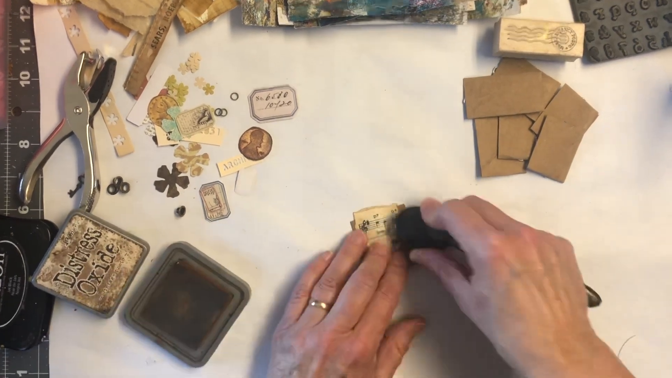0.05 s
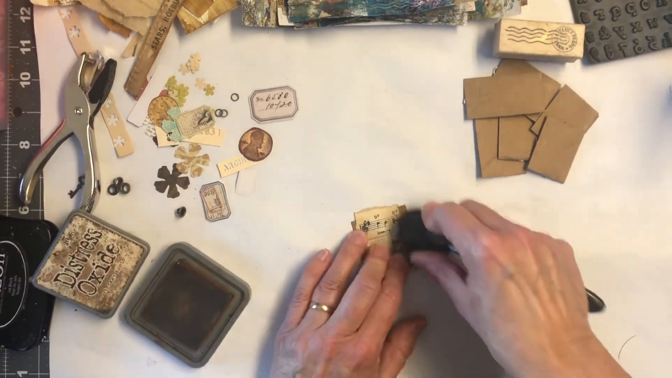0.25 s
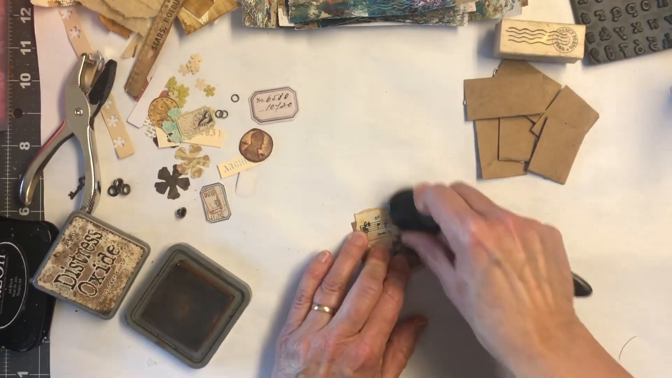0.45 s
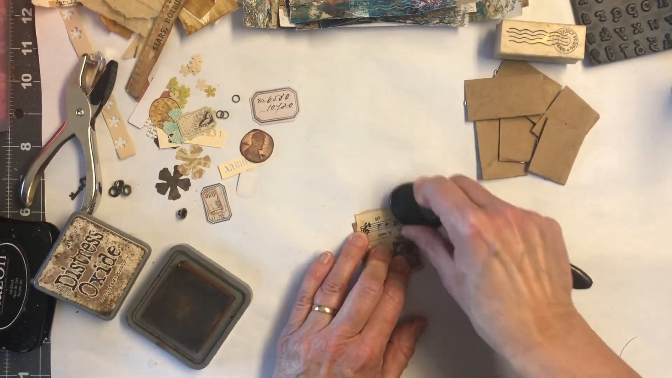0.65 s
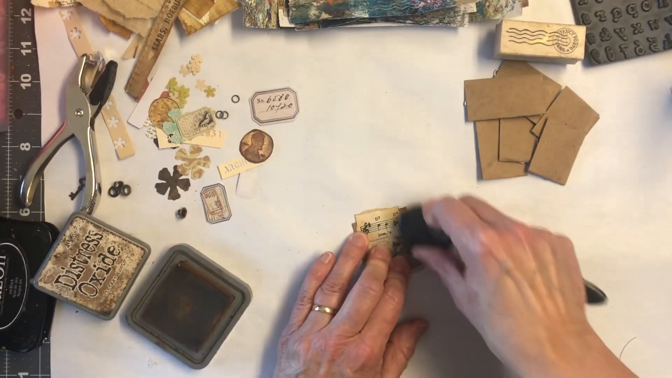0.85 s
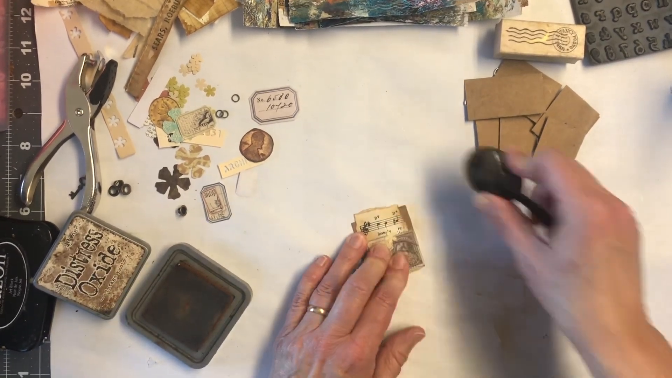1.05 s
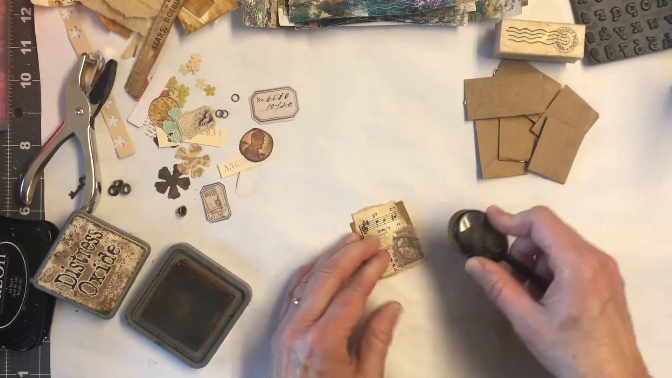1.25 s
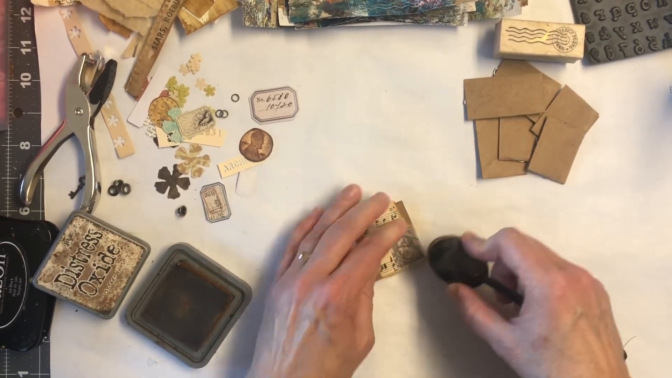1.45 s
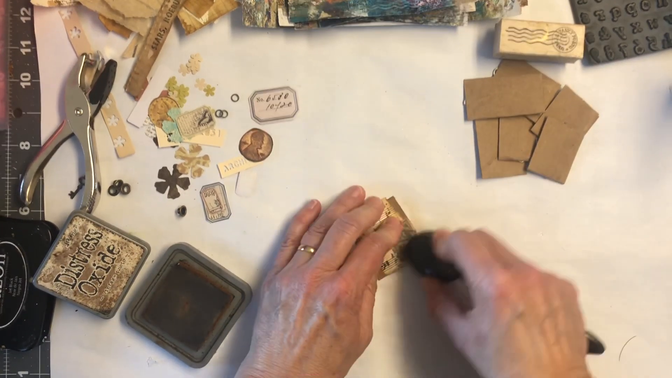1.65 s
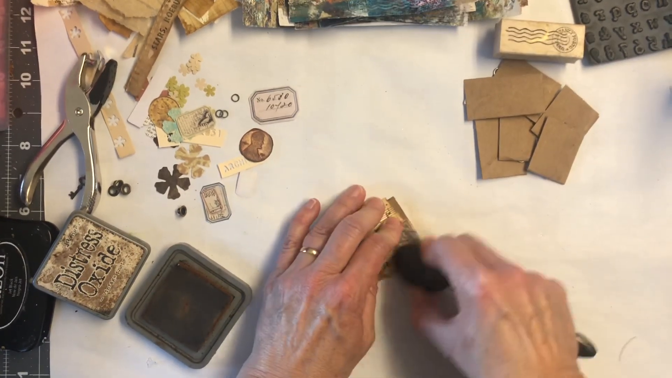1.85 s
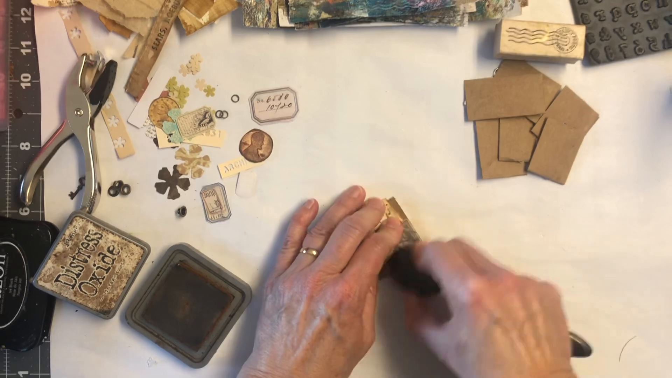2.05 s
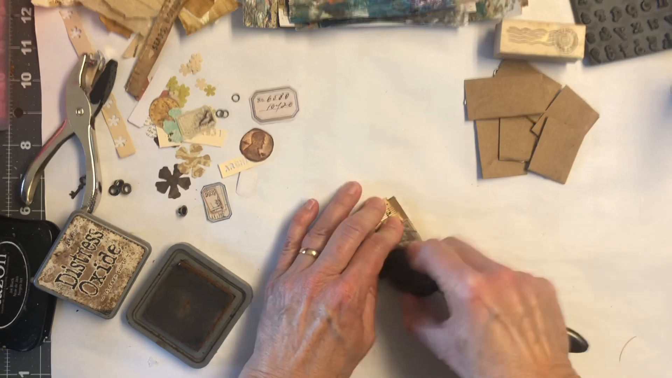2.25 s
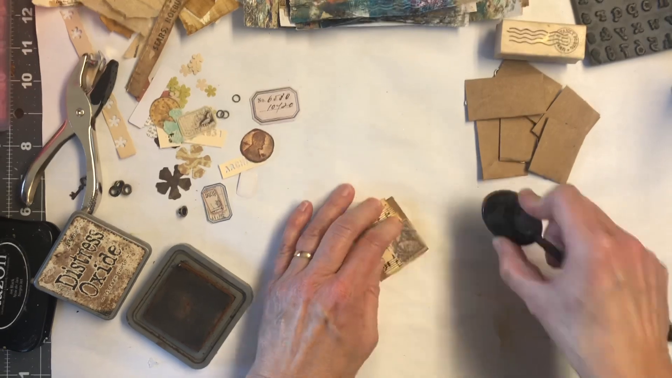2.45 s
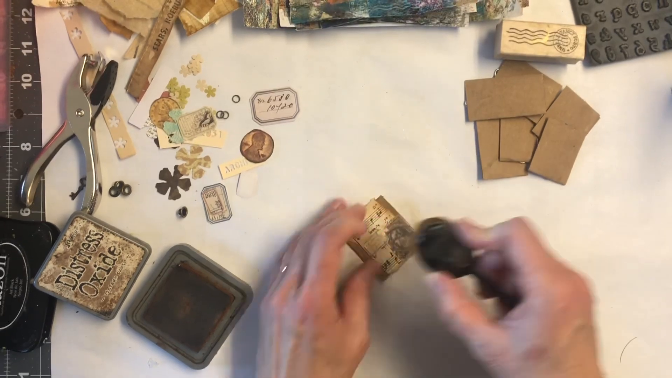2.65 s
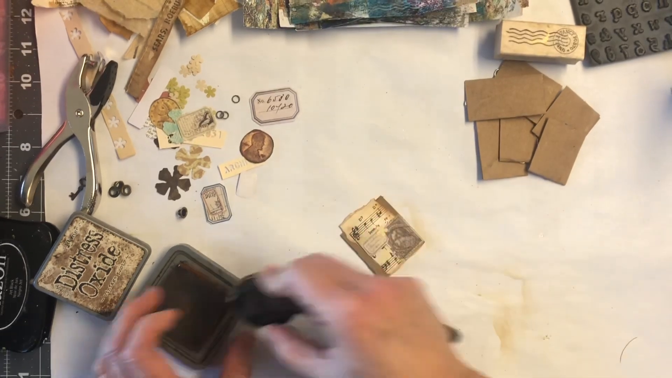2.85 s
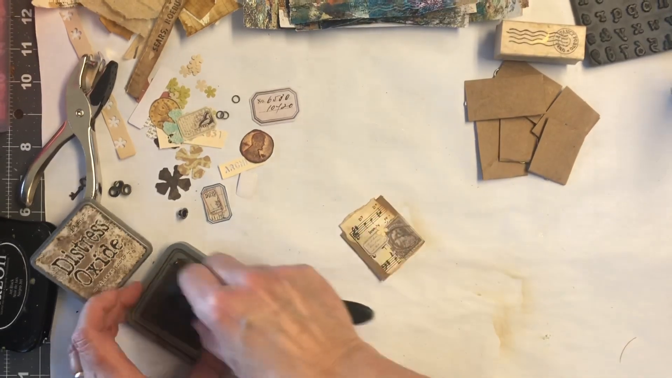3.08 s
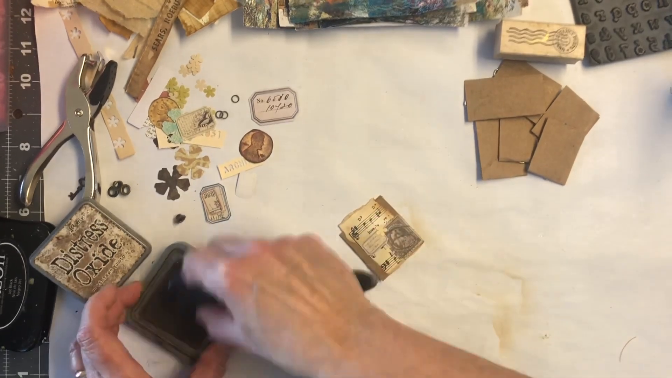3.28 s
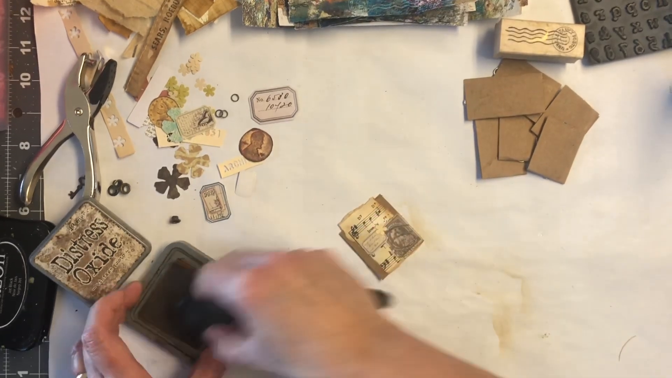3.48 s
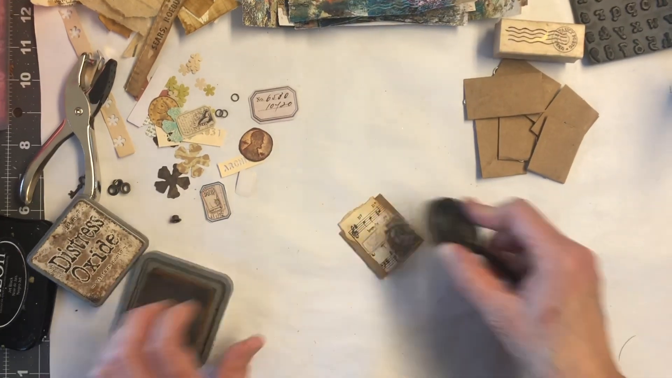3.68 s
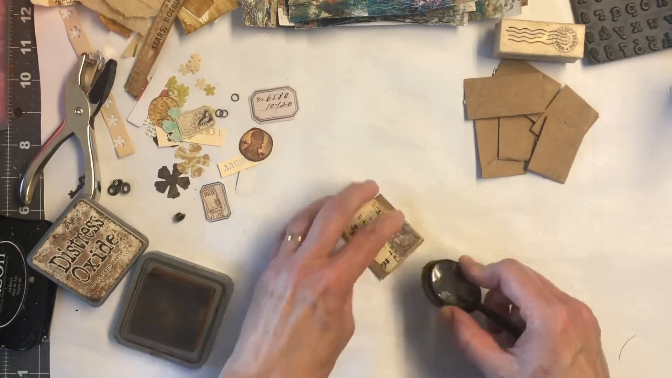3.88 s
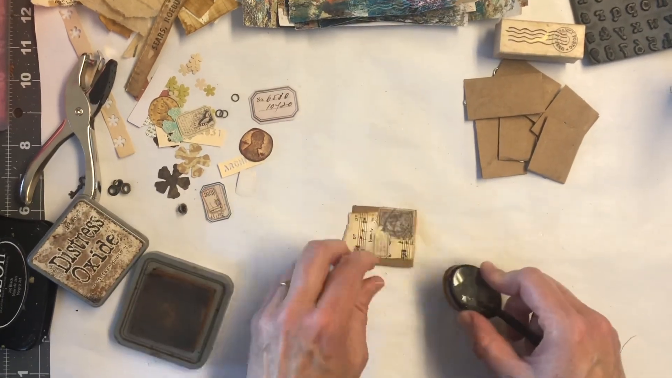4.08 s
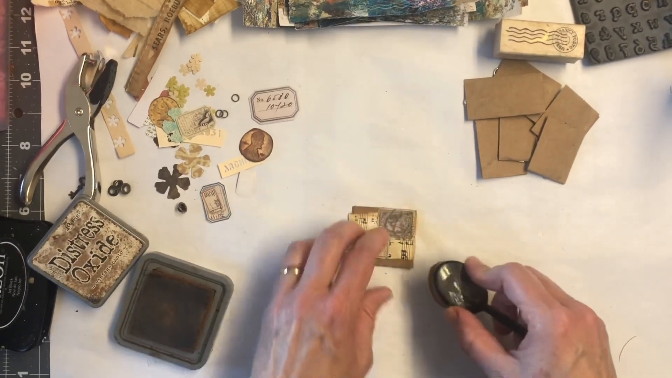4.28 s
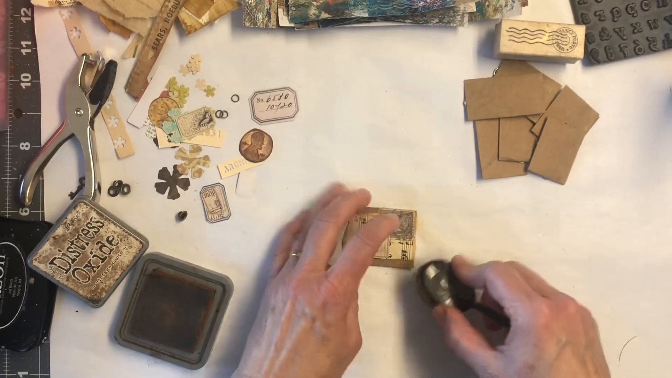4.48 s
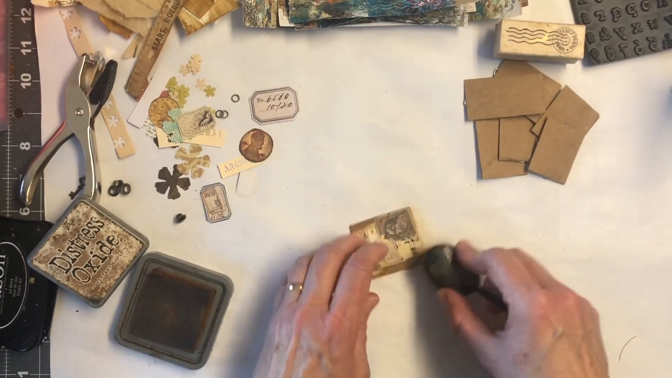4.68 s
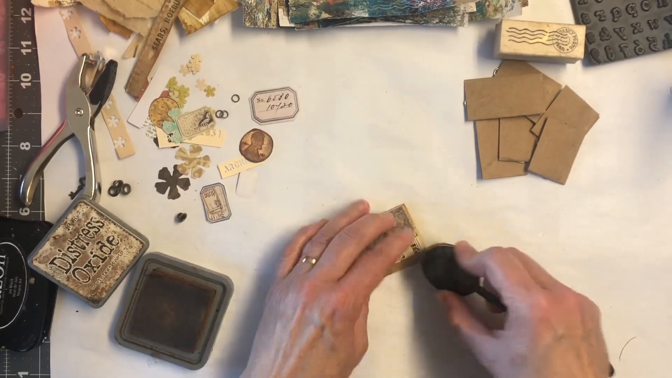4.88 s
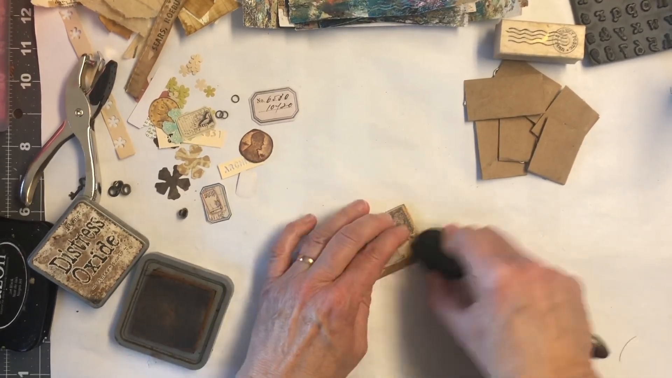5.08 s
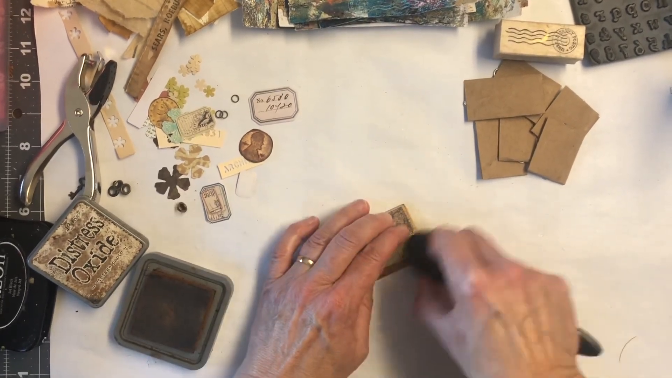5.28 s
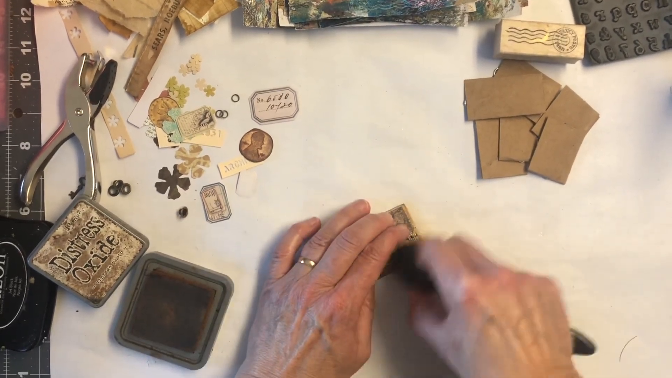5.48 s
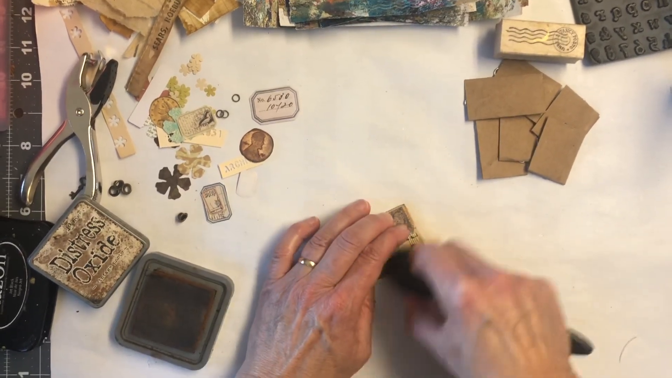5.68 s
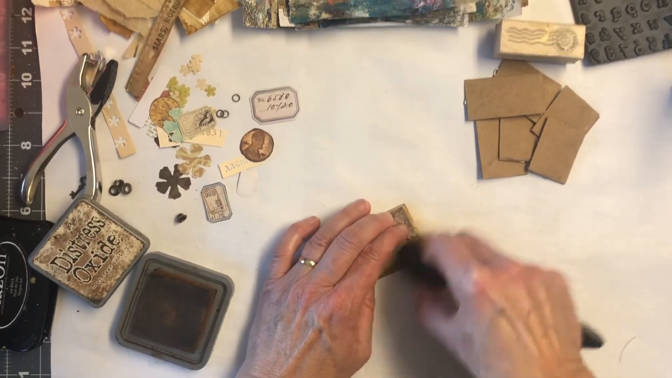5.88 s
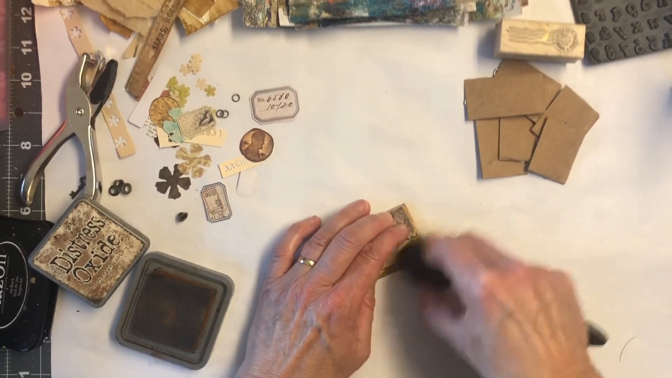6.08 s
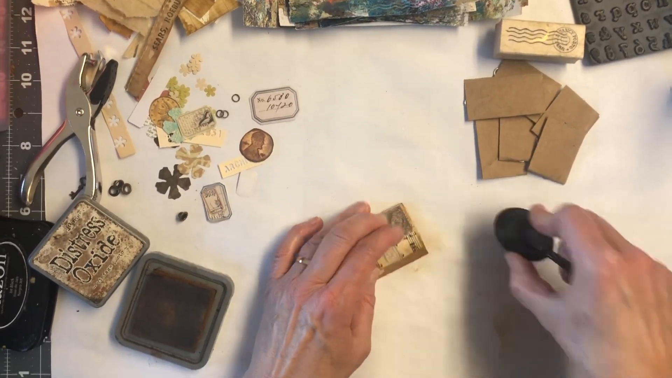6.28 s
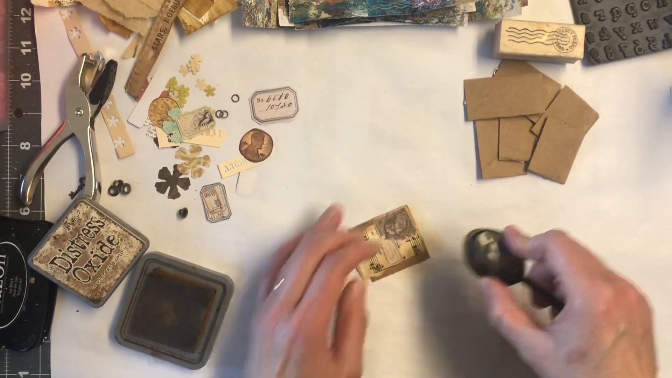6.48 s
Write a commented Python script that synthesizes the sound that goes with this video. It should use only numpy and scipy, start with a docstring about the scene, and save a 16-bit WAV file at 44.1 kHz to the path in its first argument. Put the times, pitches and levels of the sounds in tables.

```python
"""A foam blending tool rasps over the edges of a small piece of paper: single wipes, then quick scrubs.
As it works, the paper's edge flicks free and the craft table rumbles under the hand.
About three seconds in, the plastic ink pad is grabbed, dabbed and put down, its case knocking.
Fingers then slide the paper round, and a second spell of back-and-forth scrubbing ends the scene.
One microphone overhead hears it all in a small quiet room."""
import sys
import numpy as np
from scipy import signal
from scipy.fft import rfft, irfft
from scipy.io import wavfile

SR = 44100
rng = np.random.default_rng(int(sys.argv[2]) if len(sys.argv) > 2 else 0)


def wrap_up_sound(samples):
    """Save the sound to the file named by the first command line argument, as 16-bit audio."""
    columns = np.atleast_2d(samples).T
    # keep every value between -1 and 1, then stretch to whole-number steps
    tamed = np.clip(columns, -1, 1)
    steps = np.round(tamed * 32767).astype(np.int16)
    wavfile.write(sys.argv[1], SR, steps)


N = 287973
TIME = np.arange(N) / SR
# how strong each pitch is in rubbed paper: pitch_hz, level_db
PAPER_COLOUR = [(150, -31), (420, -7), (620, -10), (850, -6.5), (1200, -11), (1900, -9), (2600, -4.5),
                (3300, -2), (4200, 3.5), (6300, -0.2), (7800, -5), (11000, -6), (16000, -8)]


def rubbing():
    """Each stroke rasps on the paper and shakes the table; in the turns a light, duller touch stays."""
    # the treble opens up over the first spell: time_s, level_db
    treble_curve = [(0, -6), (.75, -5), (.95, -1.7), (2.3, -0.5), (3.3, -1.5), (5, -1)]
    # the table's rumble: pitch_hz, level_db
    rumble_colour = [(30, -6), (55, 6.5), (78, 5), (105, -4), (170, -0.5), (260, -15), (450, -16.5),
                     (900, -14), (3000, -68)]
    body, rasp, air, shake = np.zeros((4, N))
    for start, end, db, swell_db, body_db, air_db, rumble_db in strokes():
        level = from_db(db) * stroke_shape(start, end, swell_db, rise_s=0.0066, fall_s=0.0099)
        touch = from_db(db - 23) * stroke_shape(start - .028, end + .066, 0, rise_s=.018, fall_s=.0085)
        rasp += level + touch
        body += (level + touch * 2) * from_db(body_db)
        air += (level + touch) * from_db(air_db)
        # the table shakes most early in the stroke, as the hand bears down
        shake += from_db(db + rumble_db) * stroke_shape(start + .006, end, -8, rise_s=.008, fall_s=.016)
    fibres = friction(per_s=40000, spread_db=1.1, rough_db=1)
    snags = friction(per_s=900, spread_db=1.2, rough_db=2)  # the cut edge catches
    scrape = coloured(hand_echo(fibres + from_db(-12) * snags), PAPER_COLOUR)
    low, middle, top = map(unit_rms, split(scrape, [2500, 8000]))
    treble = from_db(np.interp(TIME, *np.transpose(treble_curve)))
    paper = body * low + rasp * middle + air * treble * top
    return paper + shake * coloured(rng.standard_normal(N), rumble_colour)


def strokes():
    """Every stroke of foam or finger: start_s, end_s, level_db, swell_db, body_db, air_db, rumble_db."""
    # quick scrubs, a push and a mostly lighter pull back: start_s, end_s, push_db, pull_db
    scrubs = [(1.769, 1.894, -43.5, -49), (1.948, 2.089, -43, -47.5), (2.135, 2.289, -42, -47.5),
              (5.042, 5.165, -42.5, -45.5), (5.21, 5.349, -45, -43.5), (5.397, 5.542, -45.5, -44),
              (5.584, 5.736, -42.5, -44), (5.78, 5.947, -40.5, -44.5), (5.992, 6.14, -41, -46.5)]
    # single wipes of the foam along the edge: start_s, end_s, level_db, swell_db
    wipes = [(0.067, 0.161, -45, 8.5), (0.212, 0.286, -42, 5), (0.345, 0.421, -43, 0.5),
             (0.468, 0.546, -42.5, 3), (0.605, 0.676, -42, -2), (0.716, .803, -43.5, 0.5),
             (0.848, 0.963, -43.5, -6.5), (1.562, 1.638, -48.5, 5.5), (1.677, 1.726, -49, -8.5),
             (2.323, 2.392, -41.5, 2), (4.971, 4.986, -44.5, 1), (6.149, 6.228, -44.5, 6.5)]
    # the foam is pressed flat and twisted: start_s, end_s, level_db
    presses = [(0, .049, -49), (3.28, 3.339, -49), (3.38, 3.475, -51.5)]
    # fingers slide the paper round: start_s, end_s, level_db
    slides = [(3.925, 4.05, -52.5), (4.222, 4.322, -53.5), (4.456, 4.517, -53), (4.546, 4.62, -59.5),
              (4.633, 4.724, -54)]
    # each stroke's lows, highs and table shake, next to its rasp: body_db, air_db, rumble_db
    push_grip = (-11, -4, -9.5)
    pull_grip = (-11.5, -1.6, -15.5)
    wipe_grip = (-11, -2.5, -17)
    press_grip = (-5, -6, -7)
    slide_grip = (-11, 0.13, -12.5)
    push_ends, pull_starts = 0.33, 0.57  # shares of a scrub's length
    push_swell_db, pull_swell_db, coast_db = -8, 0.5, -1.5  # level change from start to end
    for start, end, push_db, pull_db in scrubs:
        yield start, start + push_ends * (end - start), push_db, push_swell_db, *push_grip
        yield start + pull_starts * (end - start), end, pull_db, pull_swell_db, *pull_grip
    for wipe in wipes:
        yield *wipe, *wipe_grip
    for press in presses:
        yield *press, coast_db, *press_grip
    for slide in slides:
        yield *slide, coast_db, *slide_grip


def stroke_shape(start, end, swell_db, rise_s, fall_s):
    """The hand speeds up, crosses the paper with changing pressure and slows to turn."""
    speed = (1 + np.tanh((TIME - start) / rise_s)) * (1 + np.tanh((end - TIME) / fall_s)) / 4
    along = np.clip((TIME - start) / (end - start), 0, 1) - .5
    return speed * from_db(swell_db * along)


def friction(per_s, spread_db, rough_db):
    """Fibres catch and let go: many tiny clicks of uneven size, coming in clumps."""
    catches = rng.random(N) < per_s / SR
    sizes = from_db(spread_db * np.minimum(rng.exponential(1, N), 5)) * rng.standard_normal(N)
    return unit_rms(catches * sizes * from_db(rough_db * drift(400)))


def hand_echo(rasp):
    """The rasp bounces off the moving hand, so its colour shifts from stroke to stroke."""
    swing_octaves = 0.3 * drift(6.9)
    delay_s = 0.00065 * 2 ** swing_octaves
    return rasp + from_db(-10) * np.interp(TIME - delay_s, TIME, rasp)


def contacts():
    """All the sharp hits together: knocks, taps and flicks."""
    return pad_knocks() + table_taps() + paper_flicks()


def pad_knocks():
    """The ink pad's plastic case is knocked and rings; harder knocks tend to be brighter."""
    # knocks on the case: start_s, level_db, brightest_hz
    knocks = [(2.9152, -38.5, 1200), (2.954, -40, 700), (2.9655, -27, 1220), (2.9878, -62, 810),
              (3.0248, -17.5, 3350), (3.0544, -34.5, 3050), (3.203, -30.5, 3130), (3.4916, -47.5, 2750),
              (3.6183, -48, 2600), (3.6238, -29, 2820)]
    # the case's ringing tones: pitch_hz, level_db, fade_s (time to fall 60 dB)
    case_tones = [(833, 5, 0.059), (894.4, 0, 0.13), (968, 8, 0.053), (1058, 3, 0.051), (1768, -11, 0.054),
                  (1860, 3, 0.022), (2020, -13, 0.026), (2470, 1.5, 0.012), (3623, 1, 0.039),
                  (4360, 5.5, 0.021), (5600, -7.5, 0.036), (5810, 4, 0.027)]
    out = np.zeros(N)
    for start, db, brightest_hz in knocks:
        band_db = hit_colour(db, brightest_hz, below_db=7.5, above_db=7, bass_db=-1, air_db=-4)
        add(out, start, hit(band_db, case_tones, crack_s=0.015, ring_db=-10.5, low_cut_hz=740))
    return out


def table_taps():
    """Tool, fingers and ink pad land on the table with more click than tone."""
    # landings: start_s, level_db, brightest_hz, ring_hz
    taps = [(0.2298, -41.5, 4800, 4220), (0.3489, -49, 1000, 1640), (1.1112, -57, 1100, 1270),
            (1.281, -37.5, 2800, 1560), (1.3976, -28.5, 5100, 4350), (1.402, -45, 900, 765),
            (1.5050, -42, 5300, 4430), (1.5098, -37.5, 5300, 4250), (1.5124, -45.5, 800, 550),
            (2.557, -47.5, 3950, 3130), (2.5662, -41, 3040, 2790), (3.662, -38, 1030, 614),
            (3.6667, -28.5, 1450, 1640), (3.929, -47.5, 4300, 4140), (4.06, -57, 1620, 1400),
            (4.45, -42, 6030, 1950), (4.7398, -48, 2600, 2270), (4.9163, -45.5, 6100, 930),
            (4.922, -29.5, 3500, 922), (6.307, -51, 1230, 550)]
    # ringing of whatever lands: multiple_of_ring_hz, level_db, fade_s
    tap_tones = [(1, 2, 0.027), (.87, -1.5, 0.022), (1.3, -4.5, 0.017)]
    out = np.zeros(N)
    for start, db, brightest_hz, ring_hz in taps:
        band_db = hit_colour(db, brightest_hz, below_db=9, above_db=9, bass_db=1, air_db=-1)
        tones = [(ring_hz * multiple, tone_db, fade_s) for multiple, tone_db, fade_s in tap_tones]
        add(out, start, hit(band_db, tones, crack_s=0.031, ring_db=-8, low_cut_hz=390))
    return out


def paper_flicks():
    """The paper's edge catches and springs free with a thin snap."""
    # flicks of the edge: start_s, level_db, brightest_hz
    flicks = [(0.194, -48.5, 4600), (0.454, -50, 5000), (0.9811, -35.5, 7900), (2.521, -53, 5000),
              (2.761, -56.5, 11000), (3.942, -53, 4220), (4.131, -65, 10200), (4.216, -62, 10100),
              (5.2405, -37, 4170), (5.2861, -36.5, 10400), (5.331, -39.5, 3250), (5.4536, -38, 6500),
              (5.5103, -34, 2840), (5.553, -43, 3750), (5.634, -41, 7000), (5.7028, -32, 2760),
              (6.0307, -38.5, 4200), (6.1162, -47, 2000), (6.214, -52, 11000), (6.2632, -36, 8100),
              (6.4446, -54.5, 11900)]
    # ringing of the stiff paper: pitch_hz, level_db, fade_s
    paper_tones = [(2440, 3, 0.027), (3100, -9, 0.015), (8400, -24, 0.003)]
    out = np.zeros(N)
    for start, db, brightest_hz in flicks:
        band_db = hit_colour(db, brightest_hz, below_db=8, above_db=6, bass_db=-21, air_db=-1)
        add(out, start, hit(band_db, paper_tones, crack_s=0.0135, ring_db=-12.5, low_cut_hz=1000))
    return out


def hit_colour(db, brightest_hz, below_db, above_db, bass_db, air_db):
    """A hit's four band levels fall by below_db or above_db an octave away from its brightest pitch."""
    # the middle of each band: pitch_hz
    band_centres = [800, 2000, 5000, 11000]
    octaves = np.log2(np.array(band_centres) / brightest_hz)
    return db + np.minimum(below_db * octaves, -above_db * octaves) + [bass_db, 0, 0, air_db]


def hit(band_db, tones, crack_s, ring_db, low_cut_hz):
    """A hit gives a short crack of noise and sets the object ringing, a little differently each time."""
    # where the four bands meet: pitch_hz
    band_edges = [1300, 3200, 7500]
    t, attack = TIME[:SR // 4], round(.008 * SR)
    hz, tone_db, fade_s = np.transpose(tones)[:, :, None]
    snap = from_db(2 - 60 * t / 0.0029)  # the first instant stands out
    crack = rng.standard_normal(len(t)) * (from_db(-60 * t / crack_s) + snap)
    strength = from_db(ring_db + tone_db + rng.normal(0, 4.1, hz.shape)) * rng.choice([-1, 1], hz.shape)
    ring = np.sum(strength * np.sin(2 * np.pi * hz * t) * from_db(-60 * t / fade_s), axis=0)
    bands = split(filtered(crack + ring, 2, low_cut_hz, "high"), band_edges)
    bands[-1] = filtered(bands[-1], 1, 9000, "low")
    return sum(from_db(db) * band / np.std(band[:attack]) for db, band in zip(band_db, bands))


def table_bumps():
    """The heavy table answers a soft bump with a short dull thud."""
    # hands bump the table: start_s, level_db, fade_s
    bumps = [(0.016, -34, 0.15), (0.536, -40, 0.052), (1.513, -50, 0.34), (2.335, -39, 0.083),
             (2.577, -58.5, 0.12), (2.994, -42.5, 0.23), (3.666, -47.5, 0.2), (4.228, -50, 0.14),
             (4.924, -47.5, 0.32)]
    # the deep thud: pitch_hz, level_db
    thud_colour = [(30, -14.5), (70, 7), (200, 2.5), (290, -4), (600, -11.5), (1500, -19), (4000, -67)]
    level, t = np.zeros(N), TIME[:SR]
    for start, db, fade_s in bumps:
        add(level, start, from_db(db - 60 * t / fade_s) * (1 - np.exp(-t / 0.0035)))
    return level * coloured(rng.standard_normal(N), thud_colour)


def pad_drag():
    """The ink pad's hollow case stutters over the table cover, and is silent once let go."""
    # how loudly the hand drags it: time_s, level_db
    drag_curve = [(2.9, -76.5), (2.93, -56.5), (2.985, -51), (3.02, -55), (3.17, -56.5), (3.52, -70.5),
                  (3.57, -51), (3.69, -62), (3.83, -71)]
    # the case's scrape: pitch_hz, level_db
    drag_colour = [(200, -5), (650, -5), (920, -13.5), (1300, -15.5), (2800, -7), (8000, -16.5),
                   (16000, -23.5)]
    held = (TIME > drag_curve[0][0]) & (TIME < drag_curve[-1][0])
    level = held * from_db(np.interp(TIME, *np.transpose(drag_curve)))
    return level * coloured(friction(per_s=3000, spread_db=2, rough_db=3), drag_colour)


def hand_rustle():
    """Skin brushes on paper with a faint crackle."""
    # the hands shift their grip: start_s, end_s, level_db
    rustles = [(1.103, 1.267, -61.5), (2.474, 2.687, -62), (2.756, 2.85, -65.5), (6.27, 6.419, -61.5)]
    level = sum(from_db(db) * stroke_shape(start, end, 0, rise_s=0.04, fall_s=0.0107)
                for start, end, db in rustles)
    crackle = friction(per_s=2000, spread_db=2.5, rough_db=2.5) * from_db(2 * drift(60))
    return level * coloured(crackle, PAPER_COLOUR)


def room(rubs, tail_db, directions):
    """Rubs and hits echo off close surfaces; each direction feeds the tail its own colour of each hit."""
    # echoes from nearby surfaces: delay_s, level_db
    echoes = [(.0029, -24), (.0047, -25)]
    direct = rubs + contacts()
    out = direct.copy()
    for delay, db in echoes:
        add(out, delay, from_db(db) * direct)
    tails = sum(signal.oaconvolve(rubs + contacts(), room_tail())[:N] for _ in range(directions))
    return out + from_db(tail_db) * tails / np.sqrt(directions)


def room_tail():
    """Many echoes blur into a short ring that dies sooner in the treble."""
    # how long the room rings: pitch_hz, fade_s
    fade_times = [(100, 0.6), (1000, 0.28), (4000, 0.21), (8000, 0.23), (16000, 0.16)]
    t, edges_hz = TIME[:SR // 2], [350, 700, 1400, 2800, 5600, 11200]
    centres_hz = np.append(edges_hz, 2 * edges_hz[-1]) / np.sqrt(2)
    bands = split(rng.standard_normal(len(t)), edges_hz)
    tail = sum(band * from_db(-60 * t / at_hz(fade_times, hz)) for band, hz in zip(bands, centres_hz))
    tail = filtered(tail * (1 - np.exp(-t / 0.0006)), 1, 7000, "low")
    return tail / np.linalg.norm(tail)


def room_hush():
    """The quiet room has a faint, steady, low noise."""
    # the background noise: pitch_hz, level_db
    hush_colour = [(30, 1), (75, 0.5), (110, 0.5), (200, 0.5), (400, -9.5), (750, -12.5), (950, -11.5),
                   (2000, -18), (4000, -23.5), (16000, -27.5)]
    return from_db(-65.5) * coloured(rng.standard_normal(N), hush_colour)


def from_db(db):
    """Turn decibels into a number to multiply by."""
    return 10 ** (np.asarray(db) / 20)


def unit_rms(x):
    """Scale a sound so its average strength (rms) is 1."""
    return x / np.sqrt(np.mean(x ** 2) + 1e-20)


def at_hz(points, hz):
    """Read a table between its pitches, with octaves evenly spaced."""
    pitches, values = np.transpose(points)
    return np.interp(np.log(np.maximum(hz, 1)), np.log(pitches), values)


def coloured(x, colour):
    """Make each pitch as strong as a colour table says; the result has rms 1."""
    hz = np.arange(N // 2 + 1) * SR / N
    return unit_rms(irfft(rfft(x) * from_db(at_hz(colour, hz)), N))


def filtered(x, order, hz, keep):
    """Keep the lows, the highs or a band; a higher order cuts more steeply."""
    return signal.sosfilt(signal.butter(order, hz, keep, fs=SR, output="sos"), x)


def split(x, edges):
    """Cut a sound into bands at the given pitches."""
    middle = [("band", pair) for pair in zip(edges, edges[1:])]
    return [filtered(x, 3, hz, keep) for keep, hz in [("low", edges[0]), *middle, ("high", edges[-1])]]


def drift(per_s):
    """A curve that glides to a new random value per_s times a second."""
    points = rng.standard_normal(8000)
    return unit_rms(np.interp(TIME * per_s, np.arange(len(points)), points))


def add(out, start_s, sound):
    """Mix a sound in at a given time."""
    i = max(round(start_s * SR), 0)
    out[i:i + len(sound)] += sound[:N - i]


def scene():
    """All the work on the table, heard through the room."""
    rubs = rubbing() + hand_rustle() + pad_drag() + table_bumps()
    hush = room_hush()
    return (from_db(-1.42) * room(rubs, tail_db=-12.5, directions=4) + hush)[None]


def record(dry):
    """The microphone drops the deepest bass, and the highest treble is cut steeply."""
    low_cut_hz, high_cut_hz = 33, 16050
    heard = filtered(dry, 4, low_cut_hz, "high")
    return signal.sosfilt(signal.ellip(12, .1, 70, high_cut_hz, fs=SR, output="sos"), heard)


dry = scene()
out = record(dry)
wrap_up_sound(out)
```